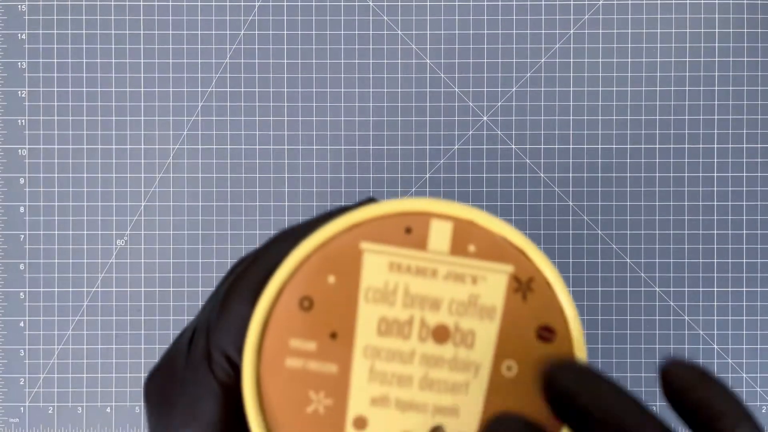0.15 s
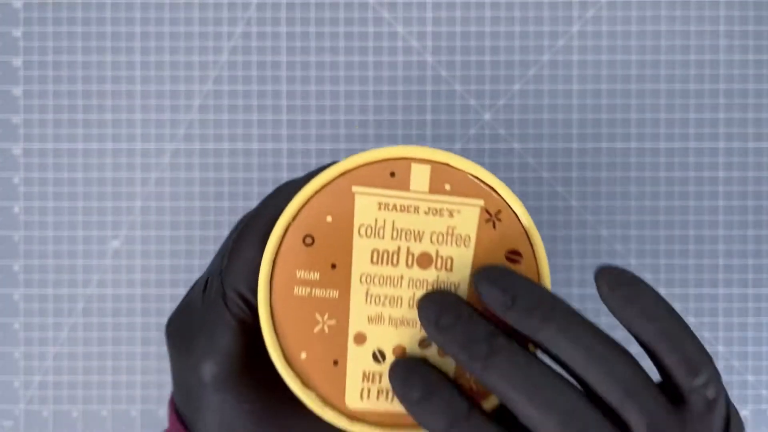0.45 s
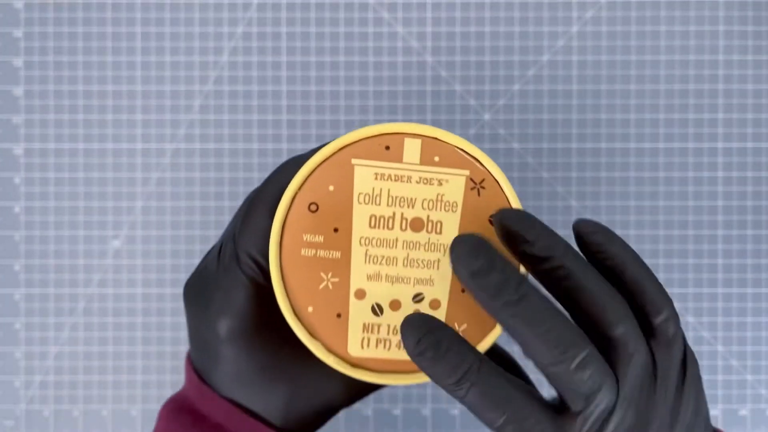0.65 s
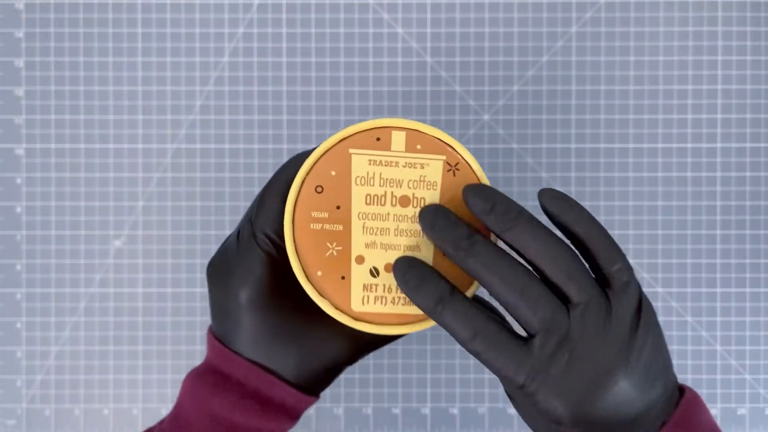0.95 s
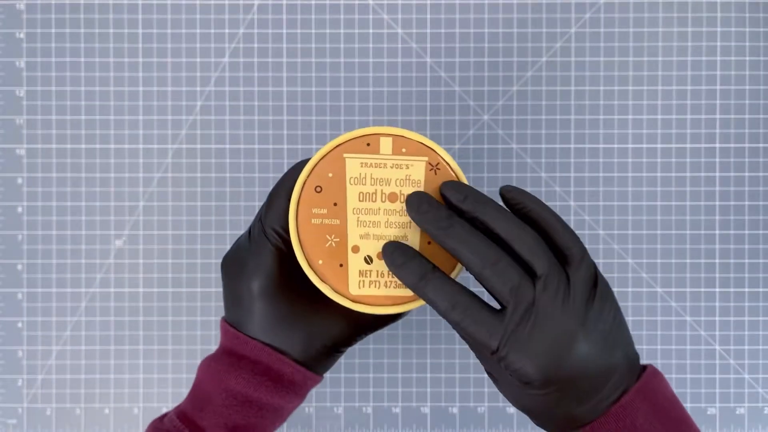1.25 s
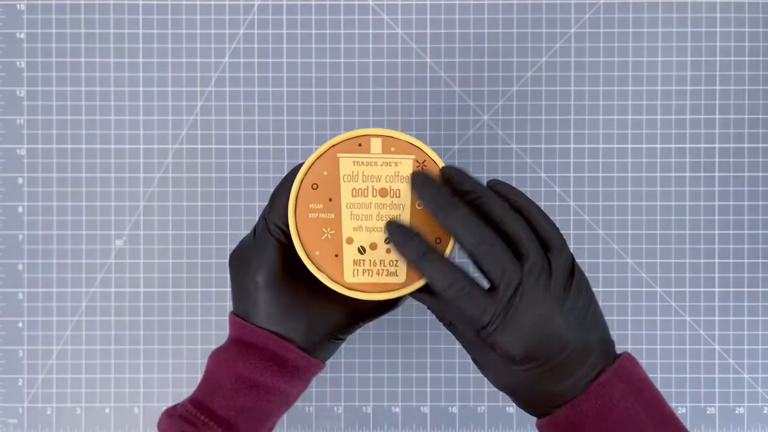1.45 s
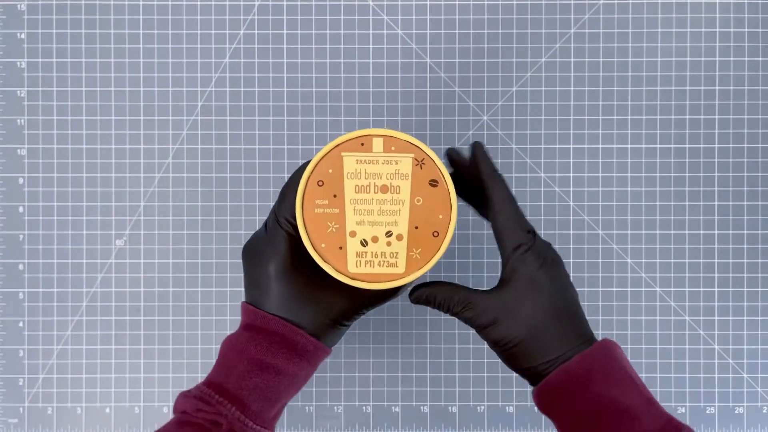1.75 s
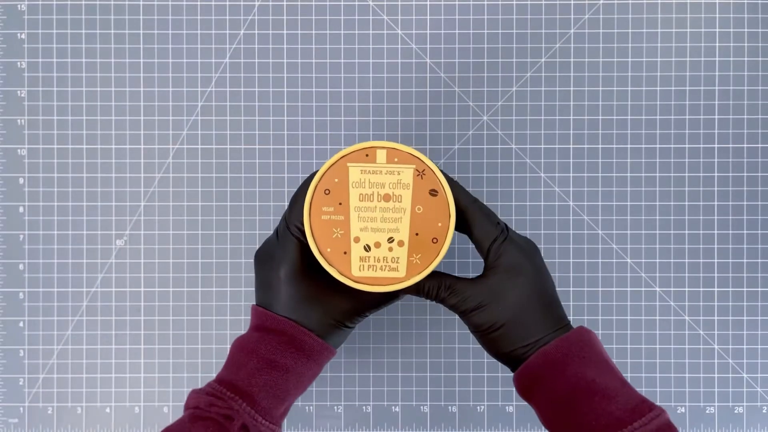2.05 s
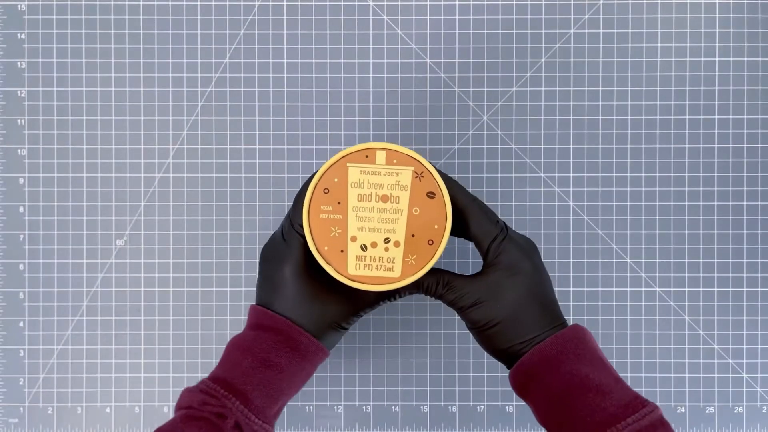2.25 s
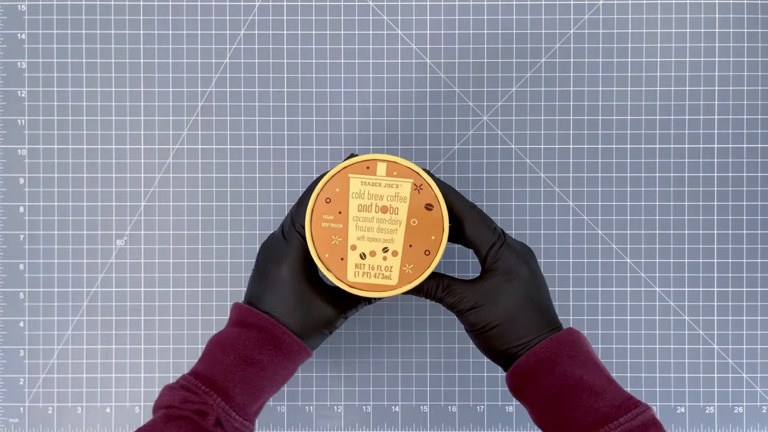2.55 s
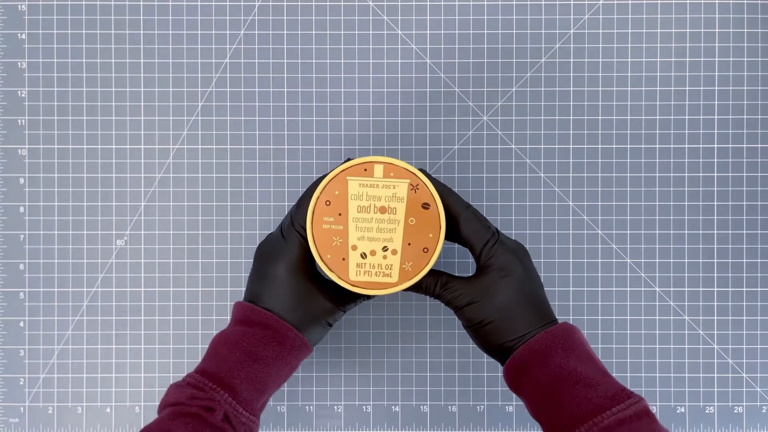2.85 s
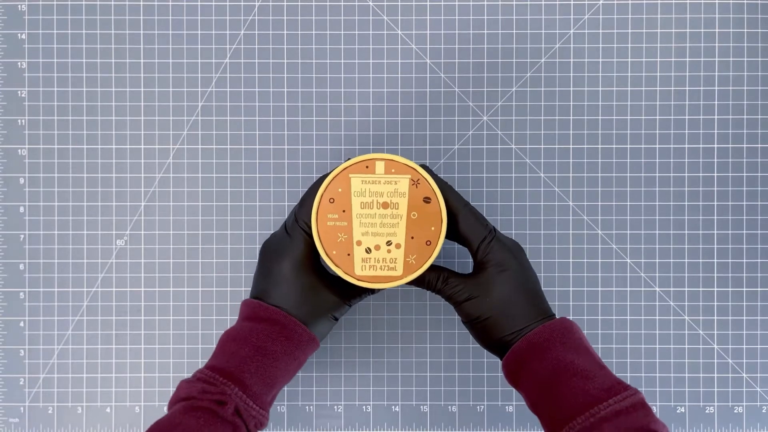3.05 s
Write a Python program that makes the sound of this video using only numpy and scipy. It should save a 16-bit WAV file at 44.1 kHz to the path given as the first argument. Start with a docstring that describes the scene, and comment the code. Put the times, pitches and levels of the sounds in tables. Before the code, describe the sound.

Light hollow finger taps and rubbery clicks on a cardboard tub, ending in a heavy set-down thump

```python
"""In the quiet air of a small room, gloved fingertips drum on the lid of a cardboard tub: damped modes,
a filled-tub thud and a papery crack. Between taps, glove creases tick as filtered clicks and rubber
rustles on card as grained noise; near 1.5 s one hand slides off the lid.
Near 3.06 s the tub is set down on a table, edge first and then flat: two soft pushes ring the table's modes.
Contact sounds gain a ceiling echo and a diffuse tail, in stereo."""
import sys
import numpy as np
from scipy import signal
from scipy.fft import rfft, irfft
from scipy.io import wavfile

SR = 44100
rng = np.random.default_rng(int(sys.argv[2]) if len(sys.argv) > 2 else 0)


def transcribe(u):
    """Save the signal u as a 16-bit wav file named by the first command-line argument.

    u: samples, shape (n,) or (channels, n), limited to [-1, 1]; the rate is SR.
    q: integer samples, one column per channel.
    """
    v = np.clip(np.atleast_2d(u).T, -1, 1)
    q = np.round(v * 32767).astype(np.int16)
    wavfile.write(sys.argv[1], SR, q)


N = 141120  # samples, 3.2 s
T = np.arange(8192) / SR  # time within one event, s
TIME = np.arange(N) / SR  # time within the scene, s

# In every table pan_db is left minus right.
# Spectral shape of the room air: freq_hz, relative_level_db
AIR_SPECTRUM = [(12, -58.5), (20, -1), (68, -14.5), (285, -15.5), (357, -11), (388, -17.5), (574, -25.5),
                (624, -24), (738, -27), (1030, -27.5), (1660, -29.5), (2140, -25), (2460, -33.5),
                (4180, -31), (10800, -36.5), (12800, -35.5), (16000, -62)]
# Stereo width of the room air: freq_hz, side_minus_mid_db
AIR_WIDTH = [(60, -12), (400, -11.5), (700, 1.5), (15000, -2.5)]
# Level of the low air: time_s, rms_db within about 100-500 Hz
AIR_RUMBLE = [(0.0, -61.5), (0.32, -59), (0.55, -61.5), (1.45, -63), (2.63, -66.5), (3.0, -65.5)]
# Glove rubber sliding on card: time_s, gain_db, pan_db, centre_hz, treble_db (re gain)
GLOVE_RUSTLE = [(0, -63, 2.5, 4400, -8), (.25, -55.5, -1.5, 4200, -12.5), (.5, -57, 3, 4500, -13),
                (.75, -55.5, -0.5, 4500, -13.5), (.95, -61.5, 2, 4500, -8), (1.2, -62, 2, 4390, -5),
                (1.47, -61, -0.5, 4400, -9), (1.54, -52.5, -3.5, 4000, -12), (1.63, -52.5, -6, 4100, -10.5),
                (1.72, -55, -1.5, 3980, -10.5), (1.85, -62, -1, 4060, -10.5), (1.9, -57.5, 2, 4600, 1),
                (1.95, -62.5, -3.5, 4300, -8.5), (2.05, -64, 4, 4200, -11.5), (2.251, -63, 1, 3470, -5.5),
                (2.501, -68, 0, 4080, -4.5), (2.9, -67.5, 3.5, 4200, -6), (3.2, -59.5, 1, 4200, -28)]
# Snapping glove creases: start_s, peak_db, centre_hz, pan_db, tail_t60_ms, width_hz
GLOVE_TICKS = [(0.0162, -43, 4620, 19.5, 10, 4000), (.219, -34.5, 4340, 4.5, 8, 4000),
               (.335, -40, 3010, 1, 8, 4030), (.459, -50, 3800, 27, 8, 4000),
               (0.5237, -43.5, 5050, 0.5, 8, 3950), (0.6047, -41, 4000, -1, 8, 4000),
               (.7447, -46.5, 4240, -3, 8, 5000), (0.801, -33, 3000, 5.5, 14, 6020),
               (.8698, -27.5, 5000, 5, 10, 3000), (1.5183, -27, 3450, -15, 5, 3320),
               (2.3041, -31, 4300, 9, 5.6, 7100)]
# Tub meeting table, edge first and then flat: start_s, peak_db, push_ms, free_ring_ms
TABLE_CONTACTS = [(3.0621, -3, 1.35, 11.7), (3.0766, -8, 2.13, 200.)]
# Modes of the table: freq_hz, relative_level_db, t60_s
TABLE_MODES = [(68, -30, .35), (85, -19, 0.69), (113, -15, .3), (135, -16.5, 0.66), (181, -0.5, .2),
               (193, 0.5, 0.18), (248, -4.5, 0.15), (303, 1.5, 0.051), (364.6, -3.5, 0.37),
               (408, -15, 0.44), (513, -11, .16), (578, -7.5, 0.14), (980, -16, .1), (1160, -3, .1)]
# Modes of the tub: freq_hz (before detuning), relative_level_db, free_t60_s
TUB_MODES = [(327.4, -5.5, .05), (599.4, 3, .07), (779, 1, 0.058), (1052, -5, 0.0401), (1124, -4.5, .06),
             (1235.2, 2.5, 0.081), (1324, 0.5, .1), (1429, 0.5, .07), (1585, 0, .07), (1710, -13.5, .07),
             (2120, -5, .05), (2433, -1, .04), (3020, -0.5, .05), (4400, -17, .03)]
# Finger taps: start_s, peak_db, favoured_hz, thud_trim_db, crack_trim_db, pan_db, contact_ms,
# after_ring_db, spread_octaves, wall_trim_db, long_mode_db, rim_mode_db (last two re ring peak)
FINGER_TAPS = [(0.1845, -22.5, 1270, -25.5, -16, -3, 3.26, -11, 0.45, 4.5, -17, -46),
               (0.2813, -24.5, 1390, -14.5, -8, -.5, 4.4, -12, 0.66, 3, -10.5, -15),
               (.3705, -20, 1435, -19, -14, -2, 3.95, -22, 0.35, 6, -37, -27),
               (0.4021, -35.5, 334, -29, -32, 4.5, 4.8, -2, 0.25, 0, -26, -40),
               (0.644, -39, 1460, -12.5, -9, 2, 1.2, -11, 0.28, 12, -33, -40),
               (.678, -29.5, 1180, -31, -8.5, -3, 2.7, -23, 0.47, 0, -20, -30),
               (.774, -27.5, 1230, -27, -11.5, -2, 4.2, -19, 0.25, 9, -22, -32),
               (0.8724, -9, 1238, -27.5, -21, -1, 1.17, -42, 0.56, 5, -43, -43),
               (.987, -40, 560, -28, -33, -1, 1.4, -13, 0.65, -3, -36, -42),
               (1.048, -43, 1381, -11, -7, -6, 1.8, -20, 0.54, 0, -27, -40),
               (1.102, -56, 1230, -39, -27, -1, 2, -9, .4, 0, -25, -40),
               (1.1629, -33, 1140, -28.5, -8.5, -3.5, 2.7, -11, 0.5, 3, -41, -30),
               (1.2113, -24, 1620, -8.5, -8.5, 3, 4.3, -26, 0.34, 7.5, -38, -25),
               (1.2176, -17.5, 1184, -27, -15.5, -3, 2.9, -45, 0.41, 2.5, -27, -36),
               (1.377, -50, 1230, -13, -12, -5, 4, -14, .3, 9, -26, -43),
               (1.396, -40, 557, -22, -32, -2, 1.7, -11, 0.65, -1, -12, -42),
               (1.675, -47.5, 1740, -21, -14, -3, 2.5, -20, 0.27, -10, -40, -41),
               (1.945, -52, 1240, -14, -14, -4, 2, -30, .6, -4, -27, -46.5),
               (2.081, -55.5, 820, -17.5, -24, 5, 2, -11.5, .5, -1, -32, -43),
               (2.212, -55, 1070, -17, -14, 4, 2.2, -20, .4, 3.5, -34, -40),
               (2.8, -49, 733, -4, -22, 15, 2.5, -23, 0.37, 3.5, -47, -39),
               (2.844, -52.5, 710, -10, -20, 16, 2, -18, .4, 1, -42.5, -43.5),
               (2.874, -55, 676, -11, -18, 13, 4.5, -22, 0.28, -1, -46, -40)]

HUM_HZ, HUM_PEAK_DB = 62, -69.5
HISS_RMS_DB, AIR_SPLIT_HZ = -66.5, 680
GRAINS_PER_S, GRAIN_DB = 2000, 3
RUSTLE_OCTAVES_BELOW, RUSTLE_OCTAVES_ABOVE = 0.76, 0.92  # widths of the moving hump
CEILING_DELAY_S, CEILING_DB = 0.0101, -13.5
ROOM_T60_S, ROOM_GAP_S, ROOM_ENERGY_DB = 0.27, 0.0049, -13
ROOM_LOW_HZ, ROOM_TOP_HZ = 196, 6120
RADIATES_ABOVE_HZ = 103
LEAD_S_PER_DB = 10.5 / 870000  # arrival lead per dB of gain in one channel
TICK_TAIL_DB = -13
RING_FLOOR_DB, RING_FALL_T60_S = -6.5, 0.025
CRACK_HZ, CRACK_WIDTH_HZ, CRACK_GAIN_DB = 3880, 5630, 6
CRACK_BASE_T60_S, CRACK_T60_PER_CONTACT = 0.02, 2
THUD_HZ, THUD_T60_S, THUD_GAIN_DB = [138.8, 225, 330, 450], 0.033, 10.5
DAMPED_T60_S, ATTACK_S, DETUNE = 0.0072, 0.0012, 0.012  # detune: standard deviation, fraction of pitch
WALL_MODE, LONG_MODE, RIM_MODE = 2, 5, 12  # rows of TUB_MODES
LONG_T60_S, RIM_T60_S = 0.12, 0.087
TOP_HZ = 16000


def undb(db):
    """Logarithmic level: 20 dB is a factor of ten in amplitude."""
    return 10 ** (np.asarray(db) / 20)


def fade(t, t60):
    """Exponential decay: amplitude falls 60 dB in t60, holding at one while t is negative."""
    return np.exp(-np.log(1000) * np.maximum(t, 0) / t60)


def unit_rms(x):
    """Power normalisation: the root mean square becomes one."""
    return x / np.sqrt(np.mean(x ** 2))


def unit_peak(x):
    """Amplitude normalisation: the largest excursion becomes one."""
    return x / np.abs(x).max()


def band(x, hz, width_hz):
    """Frequency selection: a band-pass whose edges have hz as their geometric mean."""
    low = np.sqrt(hz ** 2 + width_hz ** 2 / 4) - width_hz / 2
    high = min(low + width_hz, SR / 2.1)
    return signal.sosfilt(signal.butter(2, [low, high], "band", fs=SR, output="sos"), x)


def add(out, start_s, x, peak_db, pan_db):
    """Stereo localisation: the nearer side hears a sound louder and sooner."""
    x = unit_peak(x)
    for channel, side_db in enumerate([pan_db / 2, -pan_db / 2]):
        i = int((start_s - side_db * LEAD_S_PER_DB) * SR)
        out[channel, i:i + len(x)] += x[:N - i] * undb(peak_db + side_db)


def air():
    """Room noise: slowly rising and falling rumble under steady hiss, beside a sinusoidal mains hum."""
    f = np.maximum(np.fft.rfftfreq(N, 1 / SR), 1)

    def gain_of(table):
        hz, db = np.array(table).T
        return undb(np.interp(np.log(f), np.log(hz), db))

    mid, side = rfft(rng.standard_normal((2, N))) * gain_of(AIR_SPECTRUM)
    side = side * gain_of(AIR_WIDTH)
    both = np.array([mid + side, mid - side])
    low = irfft(both * (f < AIR_SPLIT_HZ), N)
    high = irfft(both * (f >= AIR_SPLIT_HZ), N)
    rumble_s, rumble_db = np.array(AIR_RUMBLE).T
    rumble = low / np.std(band(low, 224, 400)) * undb(np.interp(TIME, rumble_s, rumble_db))
    hum = undb(HUM_PEAK_DB) * np.sin(2 * np.pi * HUM_HZ * TIME)
    return hum + rumble + unit_rms(high) * undb(HISS_RMS_DB)


def room(x):
    """Reflection and reverberation: one ceiling echo, then exponentially decaying diffuse noise."""
    t = np.arange(SR // 2) / SR
    tail = rng.standard_normal((2, len(t))) * fade(t, ROOM_T60_S) * (t > ROOM_GAP_S)
    tail = signal.lfilter(*signal.butter(1, [ROOM_LOW_HZ, ROOM_TOP_HZ], "band", fs=SR), tail)
    tail = tail / np.sqrt((tail ** 2).sum(axis=1, keepdims=True)) * undb(ROOM_ENERGY_DB)
    echo = np.roll(x, int(CEILING_DELAY_S * SR), axis=1) * undb(CEILING_DB)
    echo = echo * (np.arange(N) > SR // 10)  # no echo in the first 0.1 s, where the end wraps round
    mono = x.mean(axis=0)[None]
    return x + echo + signal.fftconvolve(mono, tail, axes=1)[:, :N]


def rustle():
    """Sliding friction: dense random grains of noise, whose spectral centre moves with the stroke."""
    s, gain_db, pan_db, centre_hz, treble_db = np.array(GLOVE_RUSTLE).T
    hold = int(SR / GRAINS_PER_S)  # samples per grain
    draws = np.minimum(rng.standard_exponential((2, N // hold + 1)), 3)
    grain = undb(GRAIN_DB * np.repeat(draws, hold, axis=1)[:, :N])

    def hiss(hz, width_hz):
        return unit_rms(band(grain * rng.standard_normal((2, N)), hz, width_hz))

    centre = np.interp(TIME, s, centre_hz)
    out = undb(np.interp(TIME, s, treble_db)) * hiss(11500, 7840)
    for hz in 1400 * 2 ** np.arange(0, 3.1, 0.33):
        octaves = np.log2(hz / centre)
        width = np.where(hz < centre, RUSTLE_OCTAVES_BELOW, RUSTLE_OCTAVES_ABOVE)
        out = out + hiss(hz, hz / 3) * np.exp(-(octaves / width) ** 2) / 2
    pan = np.interp(TIME, s, pan_db) / 2
    return out * undb(np.interp(TIME, s, gain_db) + np.array([pan, -pan]))


def crack(hz, width_hz, t60):
    """Broadband transient: decaying noise limited to one band, with peak one."""
    return unit_peak(band(rng.standard_normal(len(T)) * fade(T, t60), hz, width_hz))


def ticks():
    """Impulsive release: snapping rubber creases give a band-limited click and a spray of noise."""
    out = np.zeros((2, N))
    for s, peak_db, hz, pan_db, tail_ms, width_hz in GLOVE_TICKS:
        click = unit_peak(band(signal.unit_impulse(len(T)), hz, width_hz))
        spray = undb(TICK_TAIL_DB) * crack(hz, width_hz, tail_ms / 1000)
        add(out, s, click + spray, peak_db, pan_db)
    return out


def landing():
    """Forced vibration: half-sine pushes ring the table; after a free time the ring falls to a weaker level,
    and the rim knocks."""
    out = np.zeros((2, N))
    f, db, t60 = np.array(TABLE_MODES).T[:, :, None]
    ring = (undb(db) * np.sin(2 * np.pi * f * T) * fade(T, t60)).sum(axis=0)
    for s, peak_db, push_ms, free_ms in TABLE_CONTACTS:
        push = np.sin(np.pi * np.clip(T[:400] * 1000 / push_ms, 0, 1))
        damping = np.maximum(fade(T - free_ms / 1000, RING_FALL_T60_S), undb(RING_FLOOR_DB))
        x = signal.fftconvolve(ring * damping, push)
        i = int(s * SR)
        out[:, i:] += unit_peak(x)[:N - i] * undb(peak_db)
    s = TABLE_CONTACTS[0][0]
    knock = lid(1610, 0.0033, after_ring_db=-10, spread=0.4, wall_db=-4, long_db=-28, rim_db=-45)
    add(out, s, knock, peak_db=-23, pan_db=0)
    add(out, s, crack(2420, 560, t60=0.013), peak_db=-29, pan_db=-1)
    add(out, s, crack(3100, 5000, t60=0.17), peak_db=-38, pan_db=0)  # hiss
    add(out, s, crack(300, 430, t60=0.18), peak_db=-24, pan_db=3)  # boom
    return out


def lid(hz, contact_s, after_ring_db, spread, wall_db, long_db, rim_db):
    """Modal damping: modes near a favoured pitch ring loudest and the finger damps them all alike; two sing on."""
    f, db, t60 = np.array(TUB_MODES).T[:, :, None]
    octaves = np.abs(np.log2(f / hz))
    gain = undb(db - 6 * octaves / max(spread, 0.05))
    gain[WALL_MODE] *= undb(wall_db)
    # Full strength during contact, then rapid damping over a weaker free ring.
    env = fade(T - contact_s, DAMPED_T60_S) + undb(after_ring_db) * fade(T, t60)
    tone = np.sin(2 * np.pi * f * (1 + DETUNE * rng.standard_normal(f.shape)) * T)
    ring = (gain * env * tone).sum(axis=0) * (1 - np.exp(-T / ATTACK_S))
    long_ring = undb(long_db) * tone[LONG_MODE] * fade(T, LONG_T60_S)
    rim_ring = undb(rim_db) * tone[RIM_MODE] * fade(T, RIM_T60_S)
    return unit_peak(ring) + long_ring + rim_ring


def taps():
    """Impact excitation: each tap sums lid modes, a thud from the filled tub and a papery crack."""
    out = np.zeros((2, N))
    thud = sum(np.sin(2 * np.pi * f * T) for f in THUD_HZ) * fade(T, THUD_T60_S) / 2
    for s, peak_db, hz, thud_db, crack_db, pan_db, contact_ms, *ring in FINGER_TAPS:
        contact_s = contact_ms / 1000
        snap = crack(CRACK_HZ, CRACK_WIDTH_HZ, CRACK_BASE_T60_S + CRACK_T60_PER_CONTACT * contact_s)
        x = lid(hz, contact_s, *ring)
        x = x + undb(thud_db + THUD_GAIN_DB) * thud
        x = x + undb(crack_db + CRACK_GAIN_DB) * snap
        add(out, s, x, peak_db, pan_db)
    return out


def scene():
    """Superposition: high-passed contact sounds excite the room, then rustle and air are added."""
    contacts = taps() + ticks() + landing()
    contacts = signal.lfilter(*signal.butter(3, RADIATES_ABOVE_HZ, "high", fs=SR), contacts)
    return room(contacts) + rustle() + air()


def record(dry):
    """Band limitation: a steep elliptic low-pass removes the extreme treble."""
    return signal.sosfilt(signal.ellip(8, 0.2, 70, TOP_HZ, fs=SR, output="sos"), dry)


dry = scene()
out = record(dry)
transcribe(out)
```